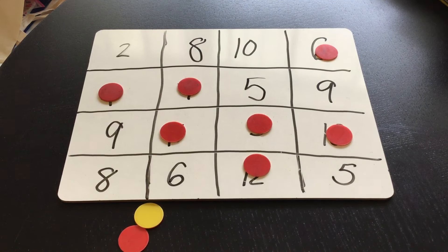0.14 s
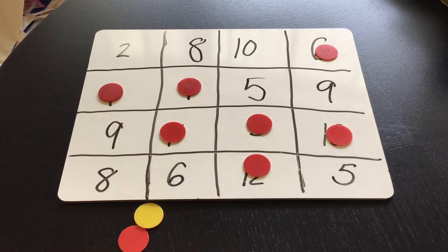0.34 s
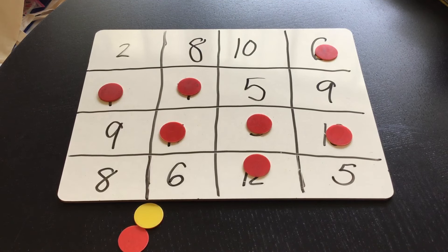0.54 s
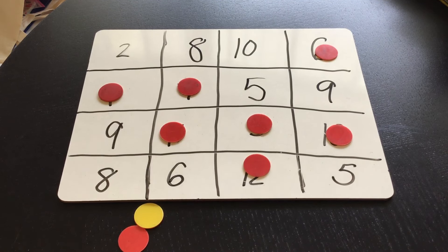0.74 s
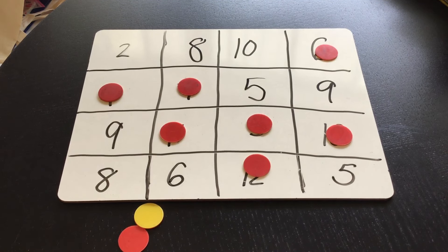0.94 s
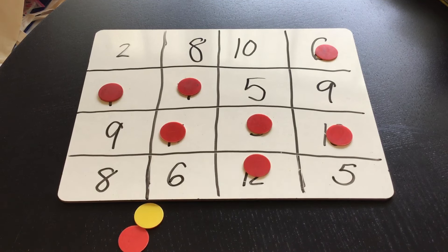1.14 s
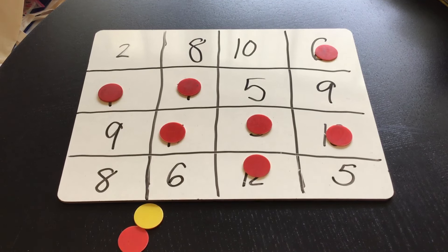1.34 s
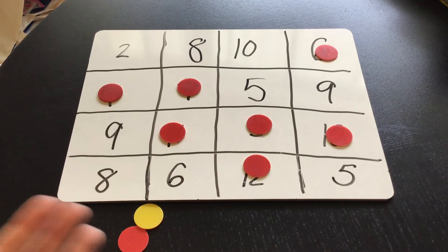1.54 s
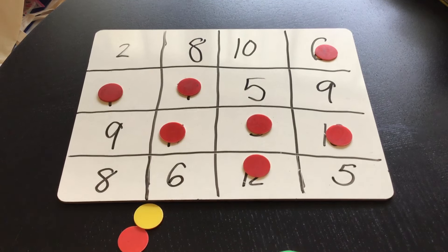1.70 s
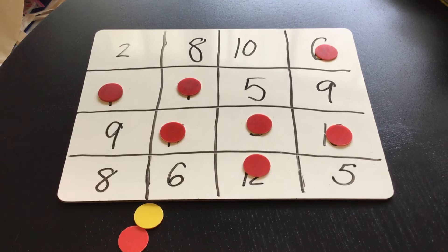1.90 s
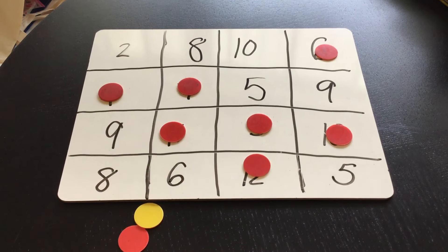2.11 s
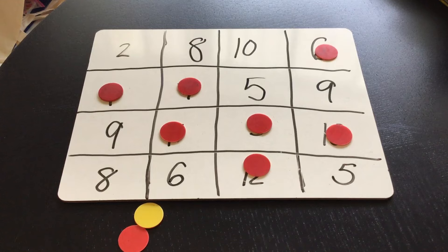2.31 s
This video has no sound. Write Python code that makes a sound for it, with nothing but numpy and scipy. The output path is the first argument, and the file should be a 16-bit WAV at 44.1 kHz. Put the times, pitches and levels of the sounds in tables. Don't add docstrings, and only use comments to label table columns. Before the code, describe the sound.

Two plastic dice are thrown onto a wooden table, hitting with hard knocks and a rapid, fading clatter of clicks; before it, very faint hand rustle and muffled ticks in a quiet small room, close microphone.

```python
import sys
import numpy as np
from scipy import signal
from scipy.fft import rfft, irfft, next_fast_len
from scipy.io import wavfile
from scipy.ndimage import map_coordinates

SR = 44100
rng = np.random.default_rng(int(sys.argv[2]) if len(sys.argv) > 2 else 0)


def gain_from_db(level_db):
    decades = np.asarray(level_db, float) / 20
    return 10 ** decades


def digitize_waveform(pressure):
    field = np.atleast_2d(pressure).T
    bounded = np.clip(field, -1, 1)
    quanta = np.round(bounded * 32767).astype(np.int16)
    wavfile.write(sys.argv[1], SR, quanta)


N = 108353


def unit(x):
    return x / np.sqrt(np.mean(x ** 2) + 1e-20)


def along(points, hz):
    f, v = np.transpose(points)
    return np.interp(np.log(hz + 1), np.log(f + 1), v, left=v[0], right=v[-1])


def wobble(rate):
    knots = rng.standard_normal(int(N * rate / SR) + 4)
    return map_coordinates(knots, [np.arange(N) * rate / SR])


def noise(spectrum, size):
    m = next_fast_len(size + 4096)
    colour = gain_from_db(along(spectrum, np.fft.rfftfreq(m, 1 / SR)))
    return unit(irfft(rfft(rng.standard_normal(m)) * colour, m)[:size])


def add(track, x, s):
    part = track[round(s * SR):][:len(x)]
    part += x[:len(part)]


def soft_start(t, rise_s):
    return 1 - np.exp(-(t / rise_s) ** 2)


# time in seconds, click level in dB, click pitch in Hz, knock level in dB.
CONTACTS = [(1.6408, -9, 3050, -8.5), (1.6877, -10.5, 3060, -14), (1.7519, -21, 3530, -18),
            (1.786, -27.5, 3340.0, -20), (1.8244, -12.5, 3250, -23), (1.8304, -11.5, 3330, -22),
            (1.8445, -37.5, 3580.0, -44), (1.8503, -22, 3120.0, -24), (1.8824, -14, 3440, -33),
            (1.8909, -3.5, 3870, -20.5), (1.9157, -17, 3490.0, -32.5), (1.9294, -17.5, 3430.0, -26),
            (1.9379, -9.0, 3670, -26.5), (1.949, -20, 3560, -29.5), (1.9709, -10, 3720, -31.5),
            (1.974, -13.5, 3640, -28), (1.989, -23, 3800, -28.5), (1.9938, -24, 3280, -48),
            (2.0028, -38, 3380, -61), (2.0266, -22, 3350, -36), (2.0559, -28, 2980.0, -34),
            (2.0777, -40, 3040.0, -36.5), (2.0952, -31, 3140, -40), (2.1156, -42, 3100, -39),
            (2.1257, -30.5, 3600, -39)]
# delay in ms, signed gain; the strongest is the direct path.
PATHS = [(-1.6, -.5), (-.8, -.2), (0, 1.05), (.45, .22), (1.1, -.28), (1.9, .45), (2.95, -.32), (3.8, .15),
         (4.7, .24), (6.5, .08)]
# pitch in Hz, level in dB, 60 dB decay time in seconds.
TABLE_MODES = [(80, -29.5, 0.067), (129, -26.5, 0.075), (232, -25, 0.09), (385.4, -19, 0.045),
               (544.4, -17.5, 0.03), (662, -19.5, .02), (797, -16.5, 0.025), (984, -7, 0.0057),
               (1400, -10.5, 0.023), (1816, -13.5, .018), (2168, -9.5, 0.028), (2810, -17, .012),
               (4800, -10, 0.0084)]
# frequency in Hz, level in dB.
GRAIN = [(60, -120), (150, -8), (500, -1.5), (1300, 1), (2200, -2.5), (3800, -15), (5100, -11), (7500, -28)]
# frequency in Hz, level in dB.
EDGE = [(5000, -120), (6500, -18.5), (8000, -34), (10500, -41.5), (12300, -29.5), (15600, -34.5),
        (15900, -120)]
LEAD_S = 1 / 200


def click(t, click_db, hz):
    delay, gain = np.transpose(PATHS)
    direct = np.argmax(gain)
    side = delay != delay[direct]
    scatter_ms = .06 * side * rng.standard_normal(len(delay))
    when = LEAD_S + (delay + scatter_ms) / 1000
    size = gain * gain_from_db(2 * side * rng.standard_normal(len(delay)))
    cycles = (t - when[:, None]) * hz
    pulses = -np.cos(2 * np.pi * cycles) * np.exp(-.5 * (cycles / .58) ** 2)
    clutter = gain_from_db(-60 * t / .016) * rng.standard_normal(len(t)) ** 3
    clutter = clutter / np.linalg.norm(clutter)
    spray = signal.fftconvolve(pulses[direct], clutter)[:len(t)]
    return gain_from_db(click_db) * size @ pulses + gain_from_db(click_db - 10.5) * spray


def knock(k, knock_db):
    mode_hz, mode_db, t60 = np.transpose(TABLE_MODES)[:, :, None]
    levels = mode_db + 1.8 * rng.standard_normal(mode_db.shape)
    pitch = mode_hz * (1 + .012 * rng.standard_normal(mode_db.shape))
    sign = (-1) ** np.arange(1, len(TABLE_MODES) + 1)[:, None]
    modes = sign * gain_from_db(levels - 60 * k / t60) * np.sin(2 * np.pi * pitch * k)
    grain = gain_from_db(-11 - 60 * k / .039) * noise(GRAIN, len(k))
    return gain_from_db(knock_db) * soft_start(k, .0005) * (np.sum(modes, 0) + grain)


def crack(k, click_db, knock_db):
    edge_db = click_db + .65 * (knock_db - click_db) - 38
    return gain_from_db(edge_db - 60 * k / .019) * (k > 0) * noise(EDGE, len(k))


def dice():
    out, bright = np.zeros(N), np.zeros(N)
    t = np.arange(SR // 12) / SR
    k = np.maximum(t - LEAD_S + .0017, 0)
    for s, click_db, hz, knock_db in CONTACTS:
        tap = click(t, click_db, hz)
        thud = knock(k, knock_db)
        add(out, tap + thud, s - LEAD_S)
        add(bright, crack(k, click_db, knock_db), s - LEAD_S)
        add(out, room(gain_from_db(-11.5) * tap + gain_from_db(-7) * thud), s - LEAD_S)
    mic = np.vstack([signal.butter(6, 6960, fs=SR, output='sos'),
                     signal.butter(3, 88, 'high', fs=SR, output='sos')])
    return signal.sosfilt(mic, out) + bright + gain_from_db(-14) * room(bright)[:N]


# frequency in Hz, 60 dB decay time in seconds.
ROOM = [(150, 0.2), (600, .3), (2000, 0.41), (5000, 0.32), (12000, 0.28)]


def room(x):
    hz, t, z = signal.stft(rng.standard_normal(SR // 3), SR, nperseg=256)
    decay = gain_from_db(-60 * t / along(ROOM, hz)[:, None])
    tail = signal.istft(z * decay, SR, nperseg=256)[1]
    late = np.pad(x, (round(.003 * SR), 0))
    return signal.fftconvolve(late, tail / np.linalg.norm(tail))


# centre in seconds, length in seconds, skin rustle level in dB, cloth hiss level in dB.
STROKES = [(0.056, 0.021, -71.5, -95), (0.266, 0.078, -69, -75), (0.408, .07, -71, -78),
           (0.579, 0.016, -69.5, -90), (0.633, 0.045, -73, -77.5), (0.799, .03, -65, -81.5),
           (0.832, .02, -66, -90), (0.871, 0.048, -67, -74.5), (1.023, 0.039, -66.5, -76),
           (1.074, 0.043, -71, -84), (1.228, 0.017, -66, -87), (1.302, .08, -72.5, -89),
           (1.466, 0.036, -79, -90.5), (1.525, 0.017, -69, -88), (2.275, .05, -76, -75.5)]
# frequency in Hz, level in dB.
RUSTLE = [(1500, -120), (2500, -21.5), (3500, -6), (4500, -7.5), (5200, 1.5), (5800, -9.5), (7000, -24),
          (9000, -120)]
# frequency in Hz, level in dB.
HISS = [(800, -120), (1500, -3), (3500, -3), (7000, -5), (10000, -9), (13000, -4), (15700, -1.5)]
# start in seconds, peak level in dB, pitch in Hz.
TICKS = [(0.34, -63, 1580), (.3825, -61, 5450), (0.415, -60.5, 4140), (0.5607, -59.5, 1770),
         (0.5592, -61.5, 2720), (0.575, -68, 4800), (0.627, -57, 5060), (.6275, -56.5, 1700),
         (0.799, -58, 830), (.8575, -56.5, 4530), (0.8568, -61, 1720), (0.9848, -61, 5000),
         (0.985, -68, 2010), (1.008, -69, 3500), (1.032, -67, 1880), (1.1124, -54.5, 4800),
         (1.2055, -58.5, 1250), (1.2224, -53, 5100), (1.41, -68, 4000), (1.458, -63, 5600),
         (1.5234, -62.5, 5600), (1.5899, -51, 4230), (1.6167, -59, 2800), (1.63, -50, 2870)]


def hand():
    t = np.arange(N) / SR
    s, length, skin_db, cloth_db = np.transpose(STROKES)[:, :, None]
    shape = np.exp(-(2 * (t - s) / length) ** 4)
    skin = unit(gain_from_db(3.35 * wobble(120.08)) * noise(RUSTLE, N))
    out = np.sum(shape * gain_from_db(skin_db - 4.5), 0) * skin
    cloth = unit(gain_from_db(2.7 * wobble(120)) * noise(HISS, N))
    out = out + np.sum(shape * gain_from_db(cloth_db), 0) * cloth
    k = t[:SR // 20]
    for s, db, hz in TICKS:
        ring = np.sin(2 * np.pi * hz * k + .48 * wobble(900)[:len(k)])
        add(out, gain_from_db(db + 4 - 60 * k / .008) * soft_start(k, .0003) * ring, s)
    return out


# time in seconds, level in dB.
STIR = [(0, -77), (.2, -74.5), (.3, -72), (.45, -74), (.57, -71), (.7, -73.5), (.9, -74), (1.15, -74.5),
        (1.5, -75), (2.45, -74.5)]
# frequency in Hz, level in dB.
LOW_AIR = [(15, -59), (30, -32.5), (60, -6), (110, -7.5), (200, -2.5), (330, -10.5), (480, -17.5),
           (1000, -26), (1300, -61.5), (2200, -120)]
# frequency in Hz, level in dB.
HIGH_AIR = [(590, -36), (1000, -1.5), (1660, -4.5), (2000, -8.5), (2190, -9), (3030, -10), (4280, -4.5),
            (10100, -25.5), (15800, -22.5)]
# pitch in Hz, level in dB, level waver in dB, phase wander in radians.
HUM = [(120, -77, 1.5, .3), (192, -64.5, 3, .7), (285, -77, 3.5, 1.5)]


def air():
    t = np.arange(N) / SR
    low_db = np.interp(t, *np.transpose(STIR)) + 9 + .8 * wobble(5)
    out = gain_from_db(low_db) * noise(LOW_AIR, N)
    out = out + gain_from_db(-77.5 + 1.1 * wobble(12)) * noise(HIGH_AIR, N)
    for hz, db, waver_db, wander in HUM:
        level = np.sqrt(2) * gain_from_db(db + waver_db * wobble(11))
        out = out + level * np.sin(2 * np.pi * hz * t + wander * wobble(15))
    return out


def scene():
    return (dice() + hand() + air())[None]


def band_limit(x):
    return signal.sosfilt(signal.butter(12, 16260, fs=SR, output="sos"), x)


def record(dry):
    return band_limit(dry)


dry = scene()
out = record(dry)
digitize_waveform(out)
```